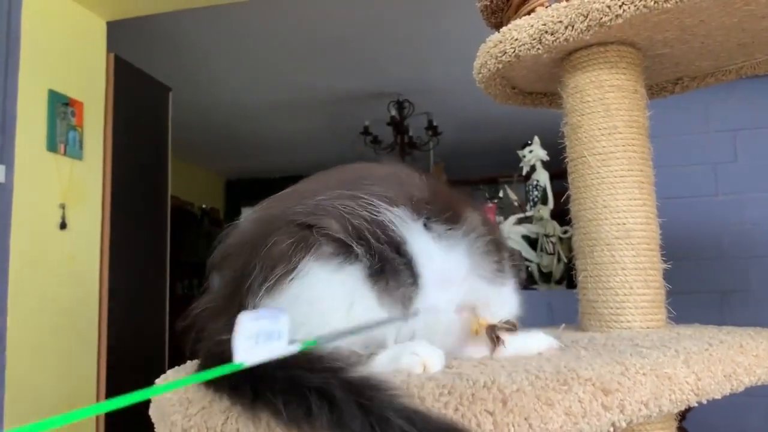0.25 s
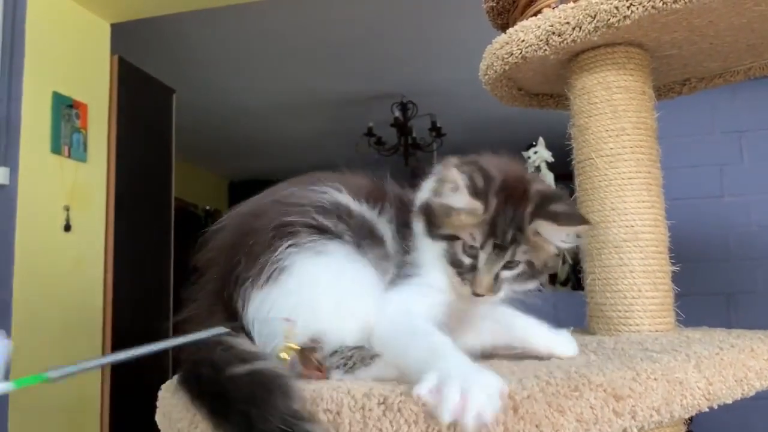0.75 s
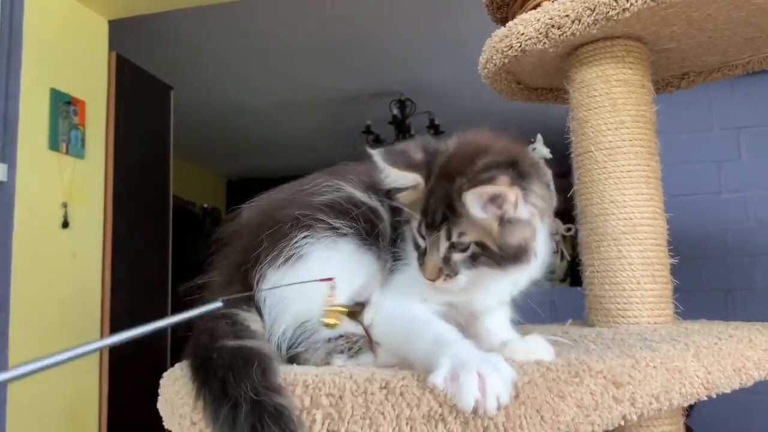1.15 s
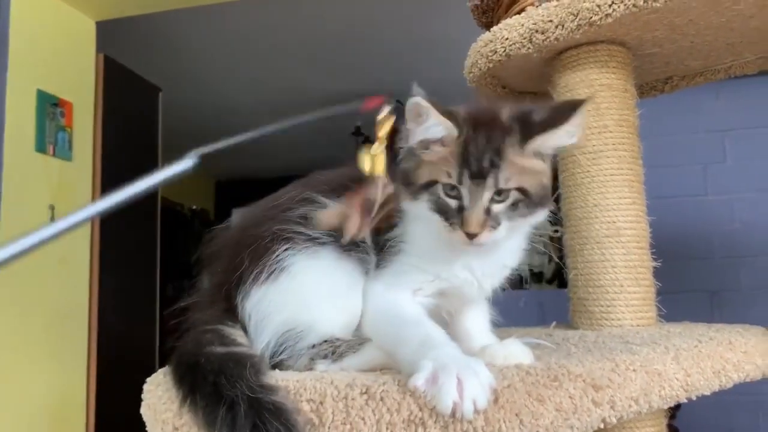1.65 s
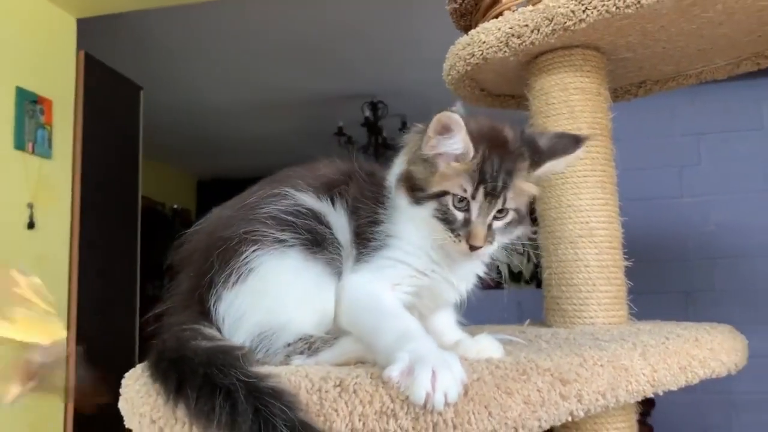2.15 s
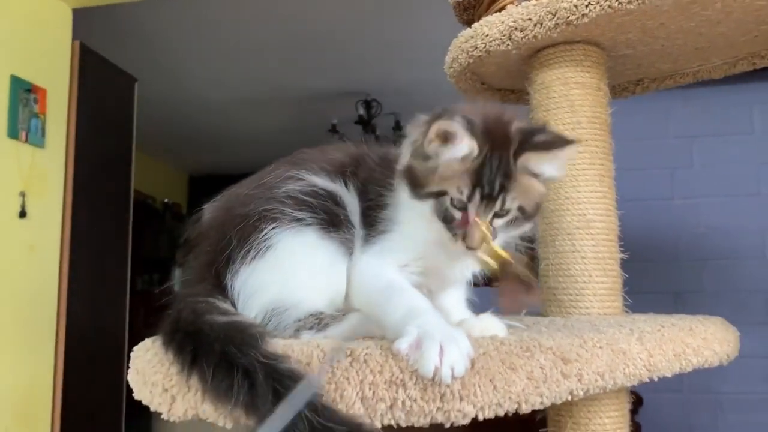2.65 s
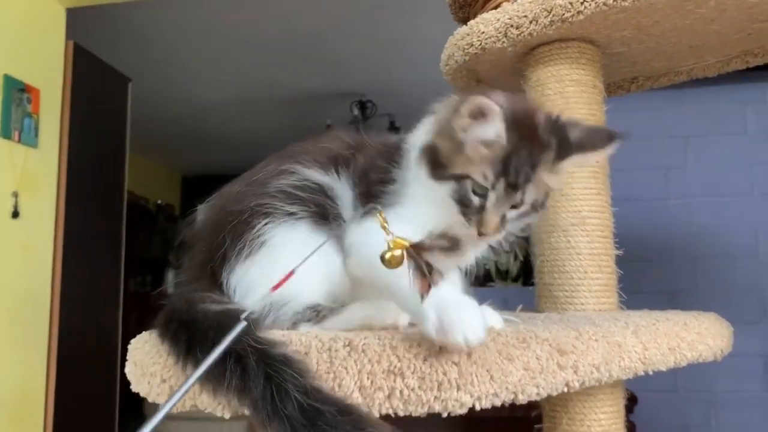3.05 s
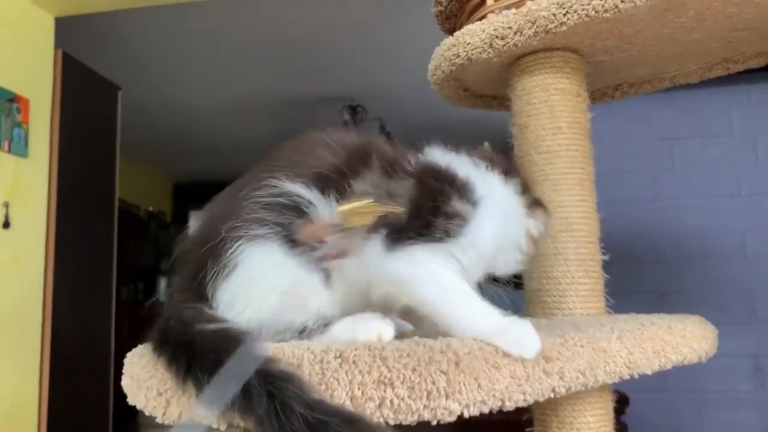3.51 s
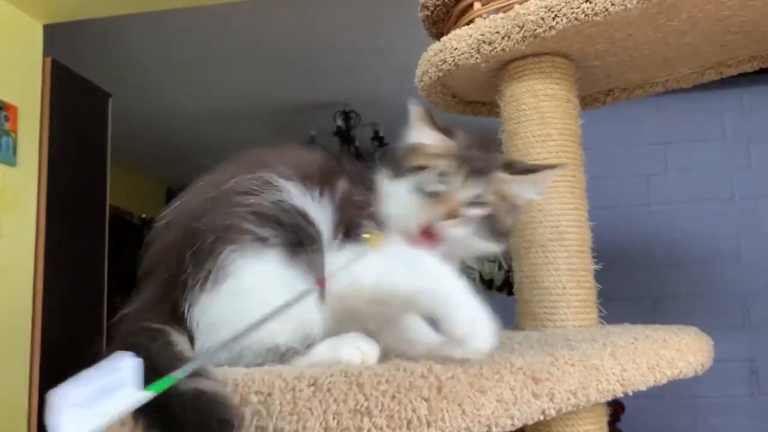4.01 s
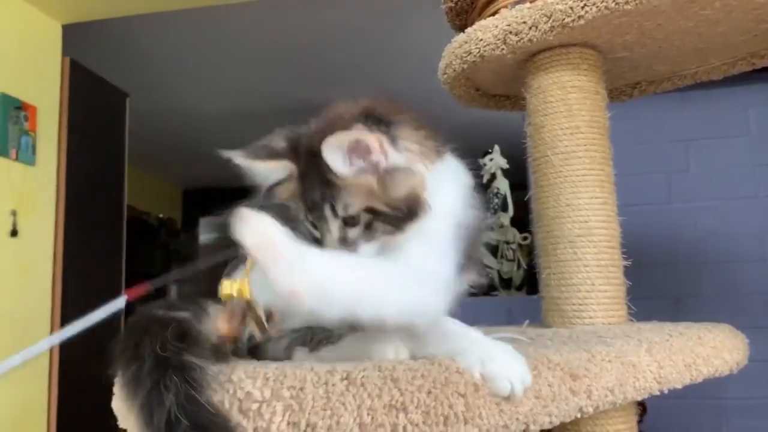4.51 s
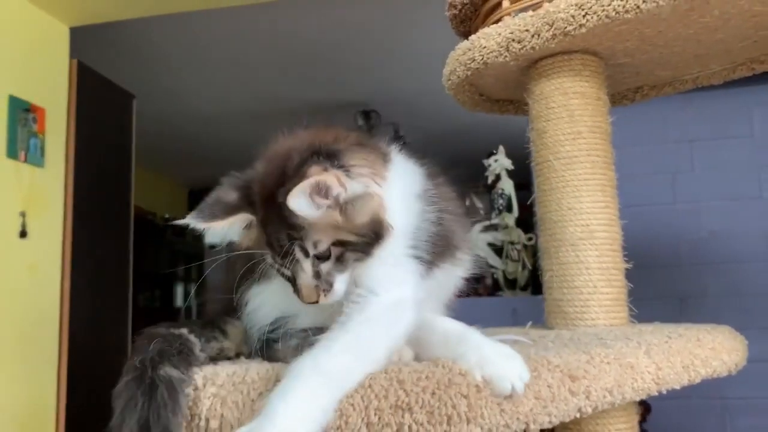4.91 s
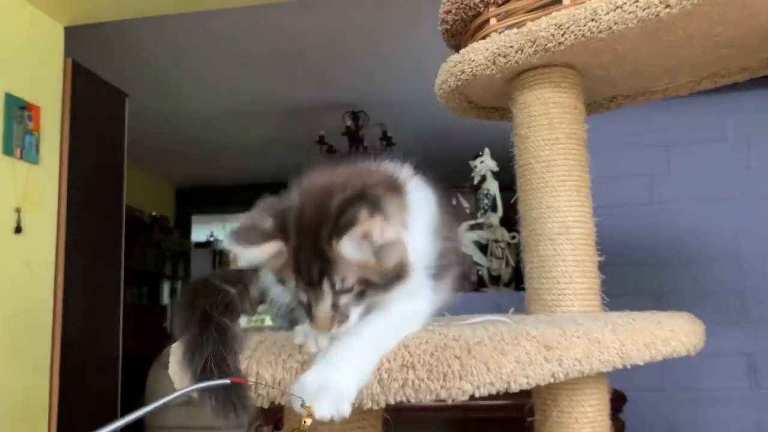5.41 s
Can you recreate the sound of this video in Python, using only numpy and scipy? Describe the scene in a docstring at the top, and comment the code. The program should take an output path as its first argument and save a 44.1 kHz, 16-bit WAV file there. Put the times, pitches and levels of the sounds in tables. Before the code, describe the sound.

A tiny brass pellet bell on a wand toy is heard close up in a quiet room, its high, glassy ring dying almost at once. At 0 s a soft jingle with a thin clasp rattle fades into light rolling; a single clink comes at 0.55 s, then only faint ticks until about 1.65 s. From 1.9 to 2.5 s it shakes briskly, with the loudest ding near 2.3 s, trailing off by 2.9 s. A near-silent pause lasts until about 3.7 s, when a sharp jingle and rolling return. From 4.1 to 4.85 s come dense, bright shakes with clattery scraping, a dry wand knock at 4.2 s and faint fur or feather brushes. A weak clink follows at 5.2 s, then a barely audible brush near 5.45 s. Very faint low rumble, distant engine hum, thin electric whine and a soft periodic swish continue underneath.

```python
"""A tiny pellet bell on a wand toy, batted by a kitten at close range in a quiet room.
Pellet strikes excite two modes of the slit brass shell; clasp rattle, rolling and clatter are scrape trains.
The wand gives filtered knocks, fur and feathers give brushes of band noise; a short tail of reflections follows.
Behind: two far engines and an electric whine (sines), a recurring noise swish, shaped noise for room air."""
import sys
import numpy as np
from scipy import signal
from scipy.fft import rfft, irfft
from scipy.io import wavfile
from scipy.ndimage import uniform_filter1d

SR = 44100
rng = np.random.default_rng(int(sys.argv[2]) if len(sys.argv) > 2 else 0)


def transcribe(u):
    """Save the signal u as a 16-bit wav file named by the first command-line argument.

    u: samples, shape (n,) or (channels, n), limited to [-1, 1]; the rate is SR.
    q: integer samples, one column per channel.
    """
    v = np.clip(np.atleast_2d(u).T, -1, 1)
    q = np.round(v * 32767).astype(np.int16)
    wavfile.write(sys.argv[1], SR, q)


N = 250047
TIME_S = np.arange(N) / SR

# Pellet strikes [t/s, strength/dB, contact tick energy re ring/dB, lower mode re ring/dB]
PELLET_STRIKES = [(0.0122, -32.5, -8, -28), (0.0367, -40, -32, -42), (0.067, -42.5, -2, -32),
                  (0.08, -53, -9, -35), (0.133, -63, -17, -36), (0.31, -55, -19, -27),
                  (0.5428, -32.5, -9, -25.5), (0.6054, -47, -18, -45), (0.7272, -60.5, -14, -39),
                  (0.862, -59.5, -20, -31), (0.898, -57.5, -1.5, -39), (1.0316, -61.5, -13, -35),
                  (1.077, -57, -4, -40), (1.138, -58.5, -16, -36), (1.2079, -52.5, -30, -32),
                  (1.237, -51.5, -21, -34), (1.283, -56, -14, -35), (1.294, -53.5, -22, -36),
                  (1.42, -58.5, -19, -35), (1.552, -64, -20, -28), (1.631, -41.5, -6, -41),
                  (1.6956, -57, -16, -35), (1.717, -46, -11, -36), (1.733, -54.5, -14, -39.5),
                  (1.929, -25, -11.5, -39), (1.9774, -33, -22, -47), (2.0015, -44, -13, -26),
                  (2.027, -43, -4, -25), (2.151, -51, 1, -36), (2.17, -37.5, 0.5, -25.5),
                  (2.1942, -37.5, -12, -18), (2.2009, -38.5, 2, -23.5), (2.2316, -49, -6, -30),
                  (2.2486, -26.5, -17, -35), (2.2635, -53, -4, -30), (2.2857, -43.5, -14, -18.5),
                  (2.3104, -14, -5, -28), (2.3278, -32, -18, -25), (2.379, -27, -2.5, -27.5),
                  (2.415, -46, -11, -27), (2.4386, -45.5, -10, -11), (2.456, -40.5, -11.5, -34),
                  (2.491, -43, -10, -26), (2.5783, -52, -30.5, -30.5), (2.6693, -55, -18, -37.5),
                  (2.792, -40, -23.5, -34.5), (2.8, -37.5, -12, -42.5), (2.8608, -51, -14, -32.5),
                  (3.5387, -63.5, -14, -38), (3.5508, -65.5, -12, -36.5), (3.711, -23.5, -3.5, -27),
                  (3.7514, -41, -15, -23), (3.837, -52, -16, -29), (3.866, -33.5, -18.5, -41),
                  (3.9998, -38, -20, -31), (4.038, -38.5, -8.5, -39), (4.1332, -23.5, -10.5, -38),
                  (4.1665, -39, -19, -38), (4.188, -33.5, -1.5, -25), (4.2088, -35, 2.5, -35),
                  (4.2192, -31.5, -8, -26), (4.2881, -40, -4, -29), (4.334, -38.5, -8, -46),
                  (4.351, -29, -4, -29.5), (4.4183, -41.5, -4.5, -50), (4.4805, -47.5, -16.5, -37),
                  (4.5119, -36.5, -8, -12.5), (4.5239, -35, -9, -26), (4.6107, -20, 0, -26.5),
                  (4.645, -34.5, -3, -23), (4.662, -46, -4, -38), (4.7176, -18.5, -9, -45.5),
                  (4.7681, -23, -10, -26), (4.783, -34, -8, -28.5), (4.8087, -51, -10, -30.5),
                  (4.8615, -46, -16, -28), (5.227, -43.5, -5.5, -23.5)]
# Shell modes ringing freely, main then lower [f/Hz, t60/s]
SHELL_MODES = [(8410, 0.28), (7738, 0.11)]
# Spectrum of metal touching metal [f/Hz, relative level/dB]
TICK_SPECTRUM = [(1500, -42), (3000, -33.5), (5500, -36.5), (6600, -23), (7600, -26), (8300, 5),
                 (8900, 8.5), (9500, -2.5), (10300, -12), (11500, -25), (12200, -42)]
# Spectrum of a strike's dull crack, also of the clatter [f/Hz, relative level/dB]
CRACK_SPECTRUM = [(1000, -19), (2700, -12.5), (4000, -2), (5600, -4.5), (7000, 6.5), (10000, -14),
                  (12000, -31)]
# Skid along the wall around a strike, weaker for hard ones [strength/dB, skid re ring/dB]
SKID_BY_STRENGTH = [(-39, -17), (-18, -34)]
# Clasp rattles while the toy is shaken [start t/s, end t/s, level/dB]
CLASP_SPANS = [(.005, 0.08, -56.5), (0.577, 0.65, -68), (1.228, 1.348, -72.5), (1.96, 2.072, -51.5),
               (2.16, 2.3, -53.5), (2.325, 2.36, -65), (2.41, 2.516, -63), (3.667, 3.79, -55.5),
               (4.13, 4.247, -52), (4.33, 4.43, -58), (4.605, 4.675, -49), (4.705, 4.72, -51),
               (4.73, 4.81, -60)]
# Spectrum of the clasp's thin links [f/Hz, relative level/dB]
LINK_SPECTRUM = [(1500, -23), (3000, -24.5), (5000, -23.5), (7300, -25), (8500, 7), (9300, -6.5),
                 (10500, -6), (11800, -17), (12400, -34)]
# Pellet rolls round the shell [start t/s, end t/s, level/dB]
ROLL_SPANS = [(.04, .23, -63.5), (.36, .47, -72.5), (1.13, 1.24, -62.5), (1.66, 1.91, -79.5),
              (2.035, 2.16, -60.5), (2.50, 2.66, -74), (2.74, 2.82, -65), (3.645, 3.86, -53.5),
              (4.07, 4.14, -65.5), (4.23, 4.42, -63), (4.8, 4.97, -74.5)]
# Toy clatters against the wand's tip [start t/s, end t/s, level/dB]
CLATTER_SPANS = [(2.015, 2.04, -65), (2.195, 2.245, -69.5), (2.32, 2.342, -75), (4.62, 4.655, -59)]
# Wand knocks [t/s, peak level/dB]
WAND_KNOCKS = [(4.2223, -33.5), (4.235, -56)]
# Spectrum of a knock [f/Hz, relative level/dB]
WAND_SPECTRUM = [(150, -4), (400, 1), (750, 7.5), (1150, 6), (1400, 4), (1800, 10), (2100, -15.5),
                 (2800, -34), (4200, -11), (6000, -45)]
# Feathers and fur brush the wand and the carpet [t/s, level/dB, fade/s, centre f/Hz]
FUR_BRUSHES = [(2.211, -79, 0.039, 1500), (4.219, -61, 0.013, 930), (4.276, -69, 0.025, 1100),
               (4.64, -79.5, 0.18, 1700), (4.89, -75, 0.072, 1900), (5.45, -78, .05, 1190)]
# Room decay [f/Hz, t60/s]
ROOM_T60 = [(500, 0.12), (4000, 0.36), (7000, 0.17), (8400, 0.3), (9600, 0.15), (11500, 0.031)]
# Spectrum of the swish [f/Hz, relative level/dB]
SWISH_SPECTRUM = [(300, -22), (800, 2.5), (1300, 9), (1700, -16.5), (2400, -24.5), (5000, -42)]
# Higher far engine, level before the channel gains [t/s, pitch f/Hz, level/dB]
HIGH_ENGINE = [(0.0, 152.4, -57.5), (1.18, 153.7, -52), (1.37, 148.7, -57.5), (1.89, 149.4, -49.5),
               (2.12, 140.6, -62), (2.86, 143, -61), (3.82, 139.9, -61), (5.08, 144.2, -64.5),
               (5.15, 141.8, -70.5), (5.64, 142.1, -61.5), (5.67, 139.5, -59)]
# Lower far engine [t/s, pitch f/Hz, level/dB]
LOW_ENGINE = [(0.0, 56.77, -63), (0.16, 51.78, -65.5), (1.22, 53.5, -53), (3.02, 58.9, -56),
              (3.76, 58.95, -63), (4.81, 62.4, -66.5), (5.05, 62.5, -79.5), (5.38, 57.6, -63.5),
              (5.67, 59.8, -61.5)]
# Electric whine lines, level before the late drop [f/Hz, level/dB]
WHINE_LINES = [(1825, -81.5), (1923, -90), (4144, -103)]
# Spectrum of the room air [f/Hz, relative density/dB per Hz]
AIR_SPECTRUM = [(15, 3.5), (35, 0.5), (65, 7.5), (100, -1), (170, 0.5), (250, -7), (400, -12.5),
                (600, -23.5), (1200, -27.5), (1800, -28.5), (2500, -37.5), (5000, -39), (9000, -34),
                (10500, -56)]
# Left-right correlation of the air [f/Hz, correlation]
AIR_CORRELATION = [(50, 0.98), (130, 1), (300, 0.94), (700, 0.87), (1300, -0.31), (2200, 0.16),
                   (9000, -0.48)]
# Slow swell of the air [t/s, level change/dB]
AIR_SWELL_DB = [(0, 0), (1.8, 1.5), (3.4, -1), (5, 0.5)]

RING_DB = 3.5  # re strike strength
SOFT_T60_S, HALVING_DB = 0.036, -9.5  # ring t60 of the softest strikes; strength that halves it
SKID_FADE_S = 0.003
CRACK_DB, CRACK_FADE_S = -29.5, 0.001  # level re strike strength
WANDER_HZ, WANDER_RATE_HZ = 45, 70  # rms pitch bend by the rolling pellet; its rate
CEILING_S, CEILING_DB = 0.015, -29
SWISH_FIRST_S, SWISH_EVERY_S = 0.666, 0.737
SWISH_RISE_S, SWISH_FADE_S, SWISH_DB = 0.057, 0.039, -63.5  # level before envelope and room
AIR_DB = -59  # before the swell
EDGE_HZ = 12200


def amp(db):
    """Decibels to gain."""
    return 10 ** (np.asarray(db) / 20)


def unit(x):
    """Scales to rms 1."""
    return x / np.sqrt(np.mean(x ** 2) + 1e-20)


def read(points, hz):
    """Interpolates a table on a log-frequency axis."""
    f, value = np.transpose(points)
    return np.interp(np.log(hz + 1), np.log(f), value)


def add(mix, s, sound):
    """Mixes a sound in at time s, in place."""
    part = mix[max(round(s * SR), 0):][:len(sound)]
    part += sound[:len(part)]


def drift(rate_hz):
    """Random low-passed fluctuation of rms 1."""
    hz = np.fft.rfftfreq(N, 1 / SR)
    return unit(irfft(rfft(rng.standard_normal(N)) / (1 + (hz / rate_hz) ** 4), N))


def click(spectrum, size=2048):
    """Minimum-phase click of the given spectrum and energy 1."""
    log_gain = np.log(amp(read(spectrum, abs(np.fft.fftfreq(size, 1 / SR)))))
    pulse = np.fft.ifft(np.exp(np.conj(signal.hilbert(log_gain)))).real[:size // 2]
    return pulse / np.linalg.norm(pulse)


def strike_contact(lead_s, rebound_db=-13, rebound_s=0.002, spot_shift=0.02):
    """One tick, its spectrum shifted by the spot that is hit, then two lighter rebounds."""
    tick = click(np.array(TICK_SPECTRUM) * [np.exp(spot_shift * rng.standard_normal()), 1])
    contact = np.zeros(len(lead_s))
    add(contact, -lead_s[0], tick)
    for delay_s in rebound_s * rng.random(2):
        add(contact, delay_s - lead_s[0], amp(rebound_db) * tick)
    return contact


def bell(rise_s=0.00041, soft_db=-13, free_db=-35, scatter_hz=22):
    """Each strike: a short skid, a sharp contact with rebounds, a dull crack, the shell's two modes."""
    lead_s = np.arange(-SR // 100, SR // 3) / SR  # 0 at the strike
    t = np.maximum(lead_s, 0)
    out = np.zeros(N)
    crack_click = click(CRACK_SPECTRUM)
    scrape = touch(TICK_SPECTRUM, shell_share=0.26)
    (main_hz, main_t60), (low_hz, low_t60) = SHELL_MODES

    def phase(hz):
        return 2 * np.pi * (hz + rng.normal(0, scatter_hz)) * t

    for s, db, hard_db, lower_db in PELLET_STRIKES:
        # a glancing blow with little tick builds its ring more slowly
        slow_rise_s = rise_s * (1 + amp(soft_db - hard_db) ** 0.5)
        onset = 1 - np.exp(-(t / slow_rise_s) ** 2)
        # the harder the pellet presses the wall, the faster the ring dies
        t60 = SOFT_T60_S / (1 + amp(db - HALVING_DB))
        ring = onset * amp(-60 * t / t60) * np.cos(phase(main_hz))
        # long, weak remainder of the main mode
        free = amp(free_db - 60 * t / main_t60) * np.sin(phase(main_hz))
        low = amp(lower_db - 60 * t / low_t60) * np.sin(phase(low_hz))

        contact = strike_contact(lead_s)
        contact *= amp(hard_db) * np.linalg.norm(ring) / np.linalg.norm(contact)
        # the sum keeps the combined energy of ring and contact
        blow = ring + contact
        blow *= np.hypot(np.linalg.norm(ring), np.linalg.norm(contact)) / np.linalg.norm(blow)

        grit = rng.standard_normal(len(t))
        skid = unit(signal.fftconvolve(grit, scrape)[:len(t)])
        skid *= amp(np.interp(db, *np.transpose(SKID_BY_STRENGTH)))
        skid *= np.exp(-abs(lead_s) / SKID_FADE_S)
        crack_noise = grit * (lead_s > 0) * np.exp(-t / CRACK_FADE_S)
        crack = amp(db + CRACK_DB) * signal.fftconvolve(crack_noise, crack_click)[:len(t)]

        strike = amp(db + RING_DB) * (blow + onset * (free + low) + skid) + crack
        add(out, s + lead_s[0], strike)
    return out


def touch(spectrum, shell_share, t60=0.029):
    """Light contact of energy 1: a tick plus some of the shell's main mode."""
    t = np.arange(1024) / SR
    mode = amp(-60 * t / t60) * np.sin(2 * np.pi * SHELL_MODES[0][0] * t)
    sound = click(spectrum) + shell_share * mode * (1 - np.exp(-t / 0.00051))
    return sound / np.linalg.norm(sound)


def rattle(spans, sound, per_s, spread_db, scrape_s):
    """Random short noise scrapes, swelling and ebbing within each span, all exciting one body."""
    strengths = amp(spread_db * np.clip(rng.standard_normal(N), -2, 2))
    touches = (rng.random(N) < per_s / SR) * strengths
    t = np.arange(512) / SR
    scrapes = signal.oaconvolve(touches, t * np.exp(-t / scrape_s))[:N] * rng.standard_normal(N)
    shake = np.zeros(N)
    for start, end, db in spans:
        shake += amp(db) * np.sin(np.pi * np.clip((TIME_S - start) / (end - start), 0, 1))
    return signal.oaconvolve(unit(scrapes) * shake, sound)[:N]


def wander(x):
    """The moving pellet bends the shell's pitch: a random frequency shift makes the ring shimmer."""
    turns = np.cumsum(WANDER_HZ * drift(WANDER_RATE_HZ)) / SR
    return (signal.hilbert(x) * np.exp(2j * np.pi * turns)).real


def rolling():
    """Dense contacts of the rolling pellet with a strong shell ring, pitch-wandered."""
    contact = touch(TICK_SPECTRUM, shell_share=0.54, t60=0.1078)
    return wander(rattle(ROLL_SPANS, contact, per_s=240, spread_db=7.5, scrape_s=0.0014))


def clasp():
    """Thin links scraping, with very little shell ring."""
    link = touch(LINK_SPECTRUM, shell_share=0.031)
    return rattle(CLASP_SPANS, link, per_s=160, spread_db=-2.5, scrape_s=0.0033)


def clatter():
    """Toy against wand tip: dull scrapes without shell ring."""
    return rattle(CLATTER_SPANS, click(CRACK_SPECTRUM), per_s=220, spread_db=6, scrape_s=0.0007)


def wand_knocks():
    """Dry impacts: one filtered click each."""
    out = np.zeros(N)
    knock = click(WAND_SPECTRUM)
    for s, db in WAND_KNOCKS:
        add(out, s, amp(db) * knock / abs(knock).max())
    return out


def brushes(width_octaves=1.0, top_hz=2300, grain_db=1.5):
    """Friction of fur and feathers: grainy band noise that rises and fades exponentially."""
    out = np.zeros(N)
    hz = np.fft.rfftfreq(N, 1 / SR) + 1
    for s, db, fade_s, centre_hz in FUR_BRUSHES:
        band = 1 / (1 + (np.log2(hz / centre_hz) / width_octaves) ** 2)
        band /= 1 + (hz / top_hz) ** 8
        noise = unit(irfft(rfft(rng.standard_normal(N)) * band, N))
        out += noise * amp(db + grain_db * drift(120)) * np.exp(-abs(TIME_S - s) / fade_s)
    return out


def ports(x, lag_s):
    """Stereo by arrival time: left lags right by lag_s."""
    hz = np.fft.rfftfreq(N, 1 / SR)
    late = irfft(rfft(x) * np.exp(-2j * np.pi * hz * lag_s), N)
    return np.array([late, x])


def room(x, wet_db, correlation, first_s=0.0028, early_db=4, early_s=0.027):
    """Random reflections, boosted early by near surfaces, each band decaying at its own rate."""
    taps = rng.standard_normal((2, SR // 2 + SR // 4))
    taps *= rng.random(taps.shape) < 0.2
    taps[1] = correlation * taps[0] + np.sqrt(1 - correlation ** 2) * taps[1]
    hz, t, z = signal.stft(taps, SR, nperseg=256)
    decay_db = early_db * np.exp(-t / early_s) - 60 * t / read(ROOM_T60, hz)[:, None]
    tail = signal.istft(z * amp(decay_db), SR, nperseg=256)[1]
    # silent until first_s, full at twice that
    tail *= np.clip(np.arange(tail.shape[1]) / SR / first_s - 1, 0, 1)
    tail /= np.linalg.norm(tail[0])
    return amp(wet_db) * signal.fftconvolve(x[None], tail, axes=1)[:, :N]


def swish():
    """Soft midrange noise that swells and fades at a fixed period."""
    age_s = np.maximum(TIME_S - SWISH_FIRST_S, 0) % SWISH_EVERY_S
    noise = unit(signal.oaconvolve(rng.standard_normal(N), click(SWISH_SPECTRUM))[:N])
    envelope = (1 - np.exp(-(age_s / SWISH_RISE_S) ** 2)) * np.exp(-age_s / SWISH_FADE_S)
    return amp(SWISH_DB) * noise * envelope


def drone(rows, waver_hz=0.82, waver_db=1.5):
    """Firing note of a far engine: one sine, wavering in pitch and level."""
    s, hz, db = np.transpose(rows)
    pitch_hz = np.interp(TIME_S, s, hz) + waver_hz * drift(6.2)
    level_db = np.interp(TIME_S, s, db) + waver_db * drift(8.3)
    return amp(level_db) * unit(np.sin(2 * np.pi * np.cumsum(pitch_hz) / SR))


def whine():
    """Thin, slightly unsteady sines that drop 8 dB near the end."""
    lines = np.zeros(N)
    for hz, db in WHINE_LINES:
        pitch_hz = hz + 2 * drift(10)
        lines += amp(db) * unit(np.sin(2 * np.pi * np.cumsum(pitch_hz) / SR))
    drop_db = np.interp(TIME_S, [5.4, 5.5], [0, -8])
    return ports(lines * amp(drop_db), lag_s=0.00016)


def air(patchy_db=2.5):
    """Low rumble and faint hiss: noise in drifting patches, nearly mono in the bass."""
    hz, _, (left, other) = signal.stft(rng.standard_normal((2, N)), SR, nperseg=4096)
    same = np.clip(read(AIR_CORRELATION, hz), -1, 1)[:, None]
    right = same * left + np.sqrt(1 - same ** 2) * other
    patches = uniform_filter1d(rng.standard_normal(left.shape), size=40, axis=0)
    patches = unit(uniform_filter1d(patches, size=3, axis=1))
    z = np.array([left, right]) * amp(read(AIR_SPECTRUM, hz)[:, None] + patchy_db * patches)
    noise = unit(signal.istft(z, SR, nperseg=4096)[1][:, :N])
    return noise * amp(AIR_DB + np.interp(TIME_S, *np.transpose(AIR_SWELL_DB)))


def scene():
    """Toy a little to the right, wand a little to the left, ceiling echo, room, background."""
    toy = bell() + clasp() + rolling() + clatter()
    wand = wand_knocks() + brushes()
    near = ports(toy, lag_s=0.00014) + ports(wand, lag_s=-0.000086)
    for channel in near:
        add(channel, CEILING_S, amp(CEILING_DB) * channel)
    echoes = room(toy, wet_db=-16.5, correlation=0.97) + room(wand, wet_db=-12.5, correlation=0.092)
    swishes = room(swish(), wet_db=1.0, correlation=0.46)
    # higher engine: both channels in phase, right a little weaker
    left_right_db = [[1], [-1.3]]
    engines = drone(LOW_ENGINE) + drone(HIGH_ENGINE) * amp(left_right_db)
    return near + echoes + swishes + engines + whine() + air()


def record(dry):
    """Linear-phase low-pass: the recorder's band limit."""
    lowpass = signal.firwin(255, EDGE_HZ, window=("kaiser", 8), fs=SR)
    return signal.oaconvolve(dry, lowpass[None], "same")


dry = scene()
out = record(dry)
transcribe(out)
```